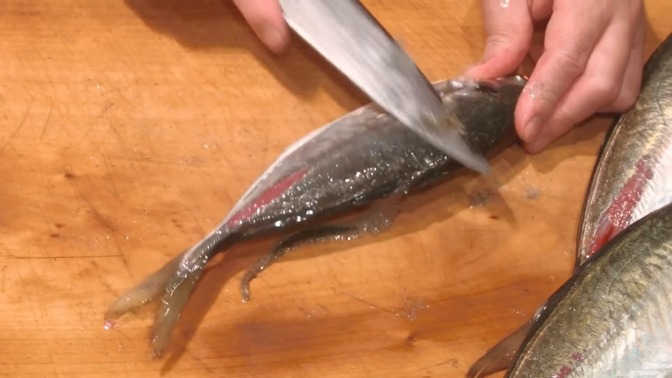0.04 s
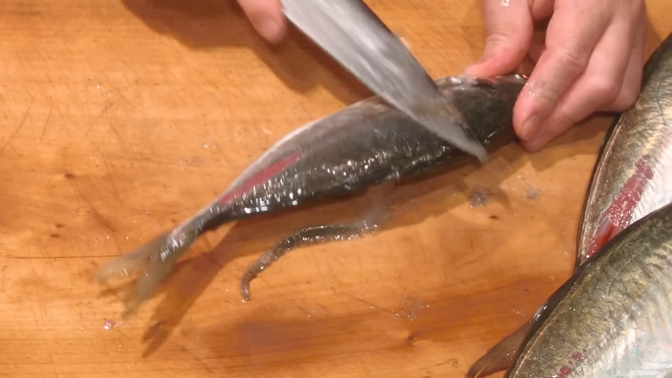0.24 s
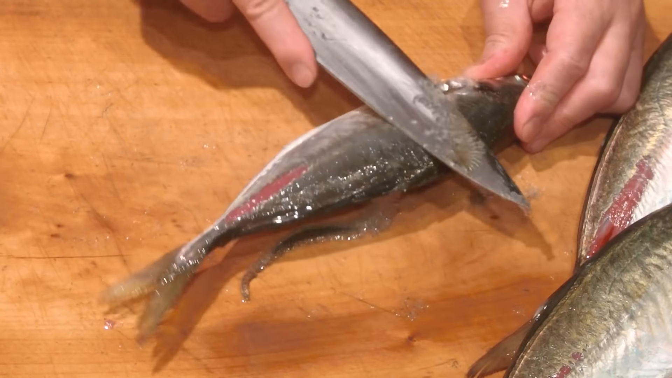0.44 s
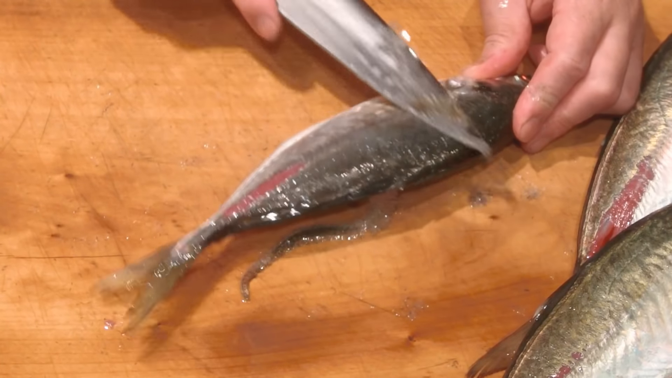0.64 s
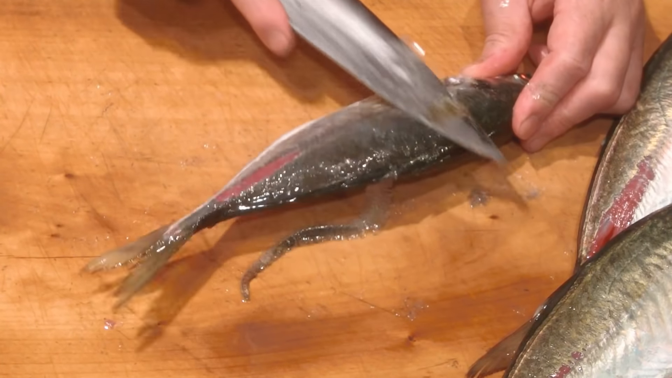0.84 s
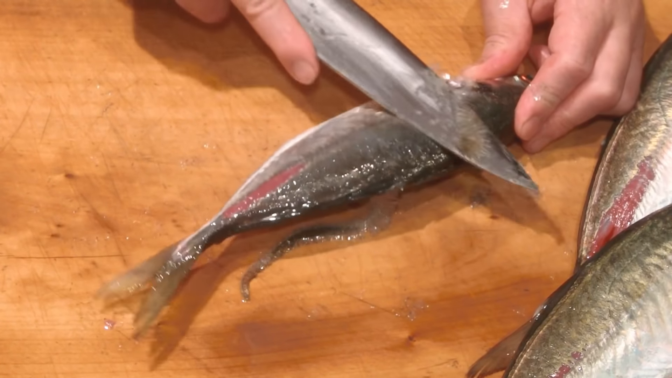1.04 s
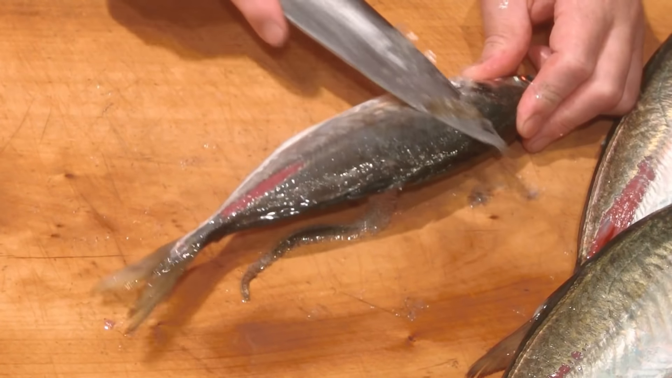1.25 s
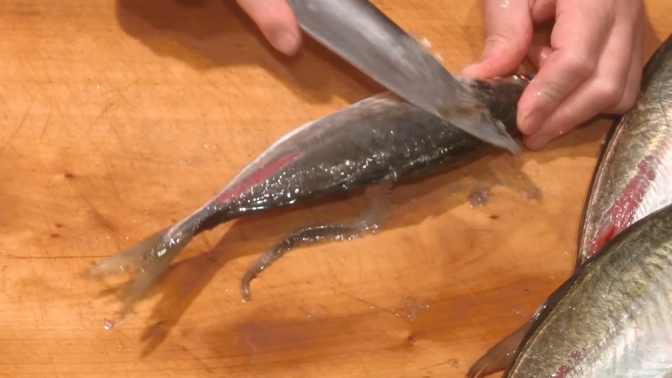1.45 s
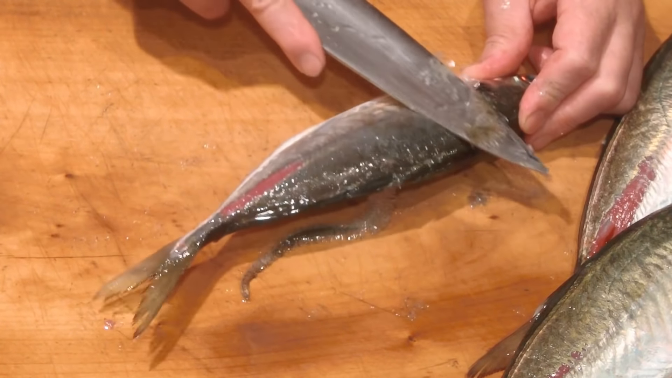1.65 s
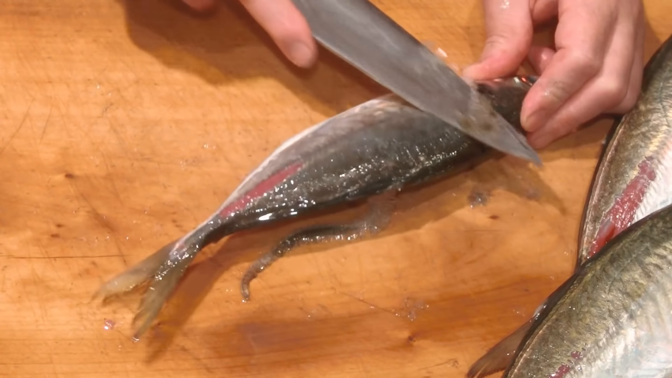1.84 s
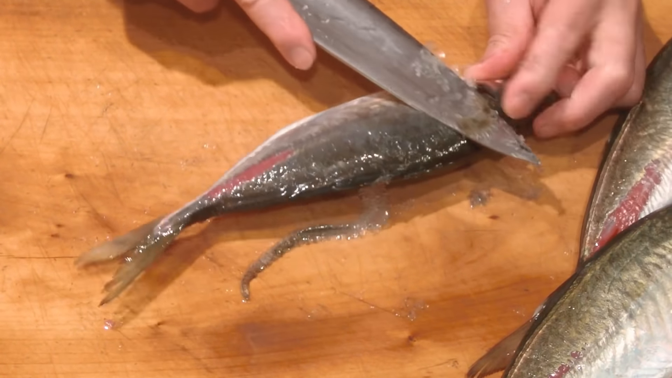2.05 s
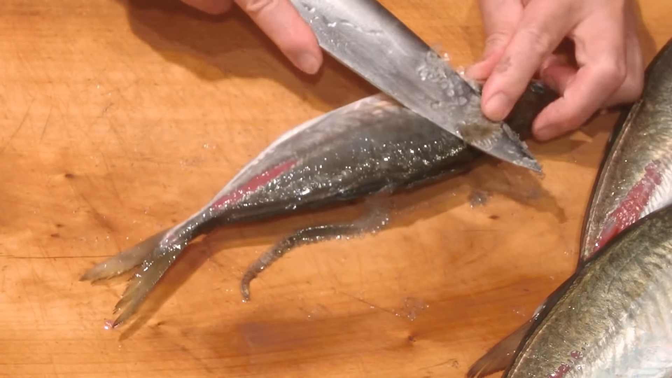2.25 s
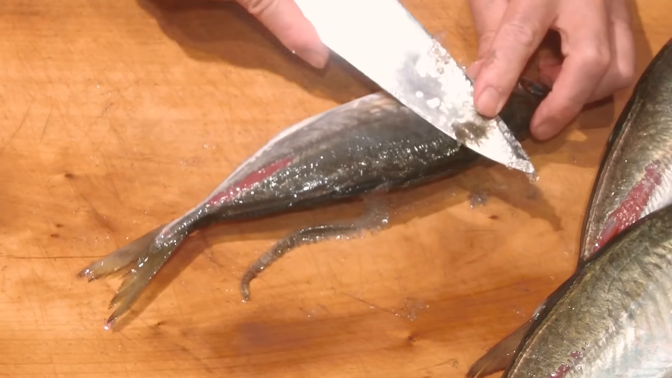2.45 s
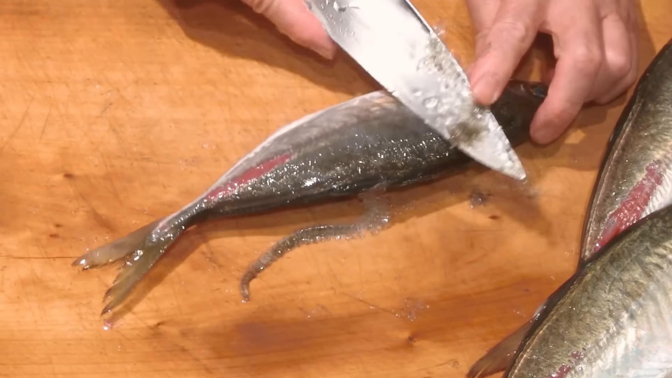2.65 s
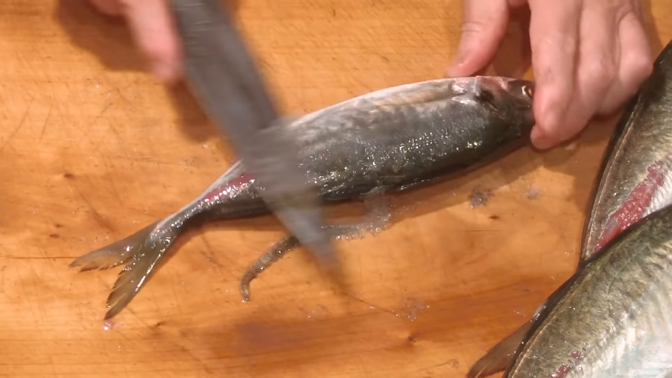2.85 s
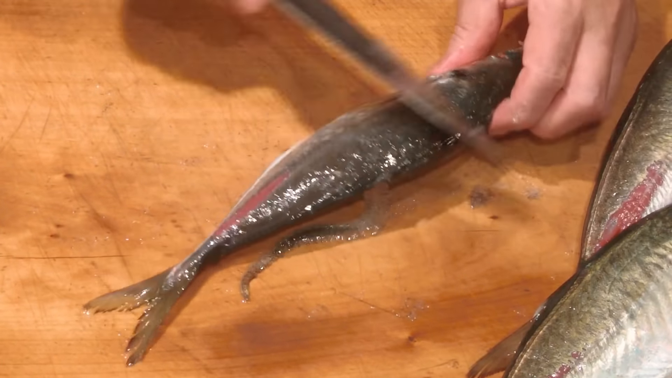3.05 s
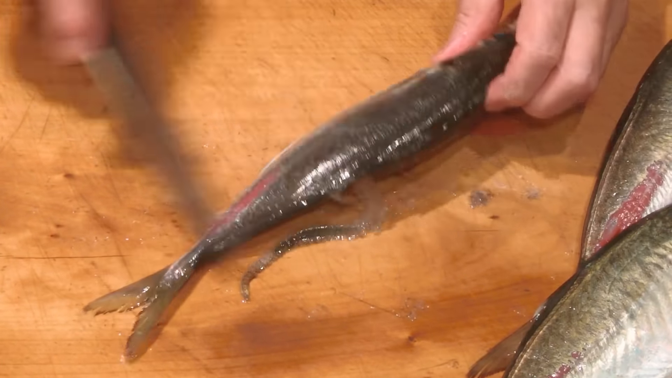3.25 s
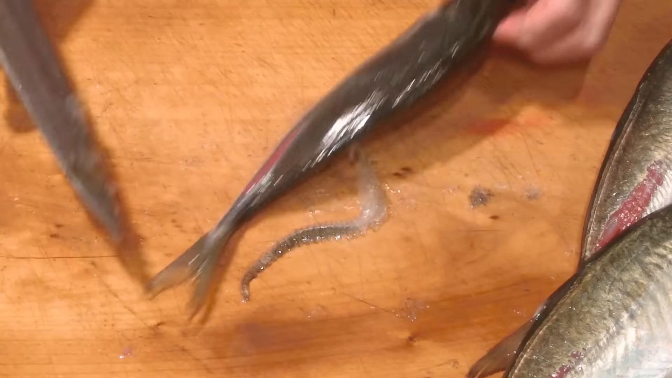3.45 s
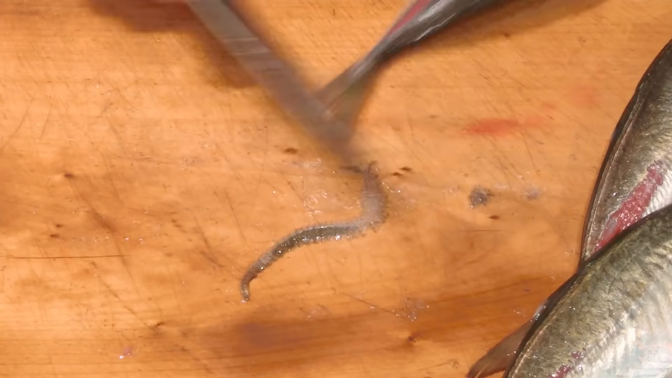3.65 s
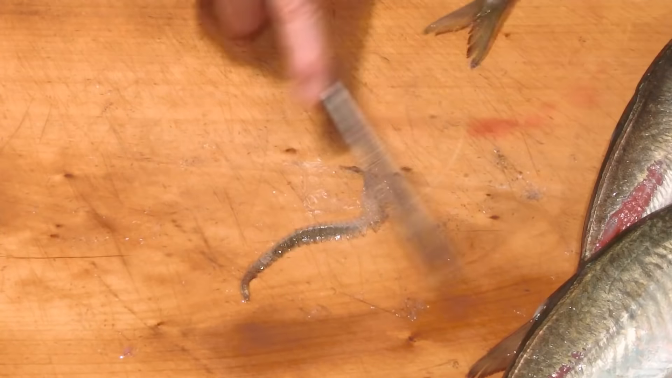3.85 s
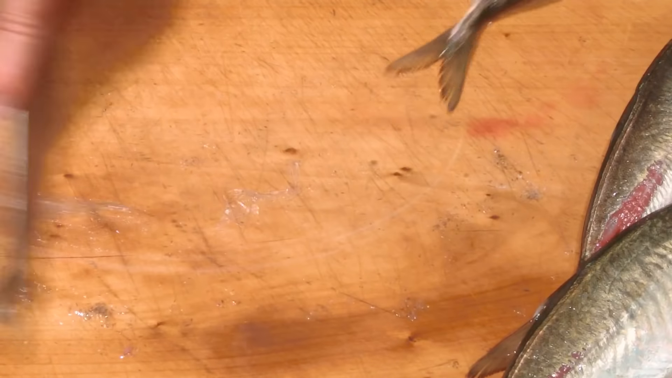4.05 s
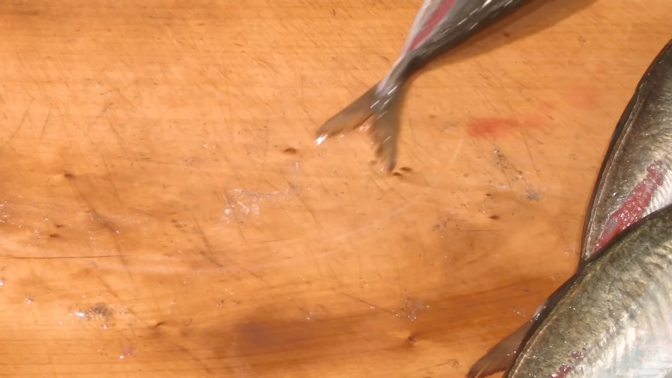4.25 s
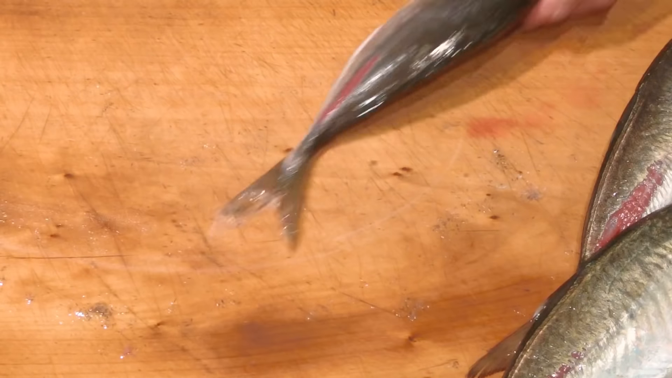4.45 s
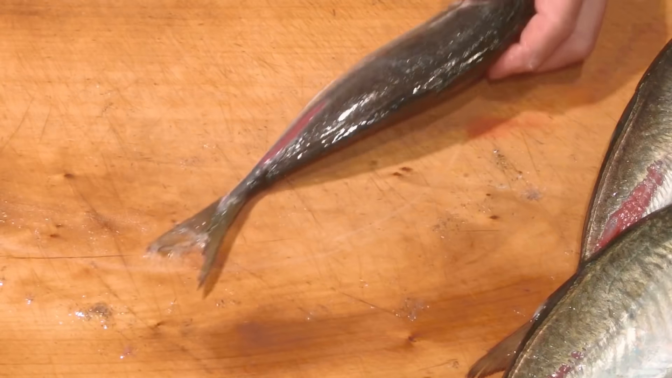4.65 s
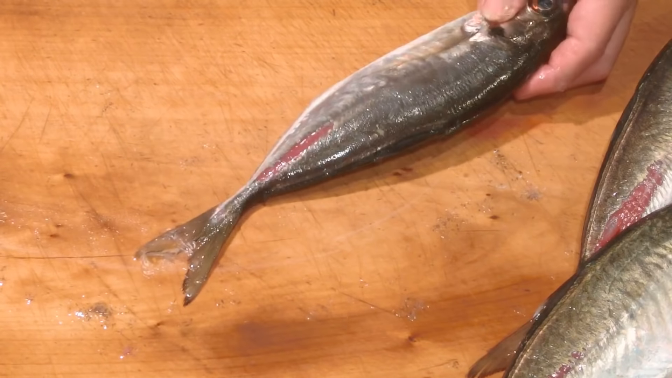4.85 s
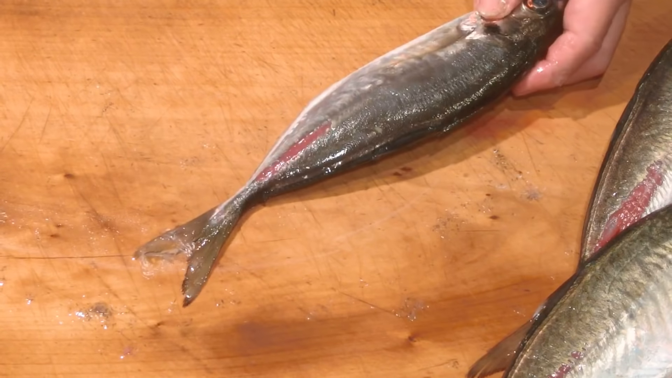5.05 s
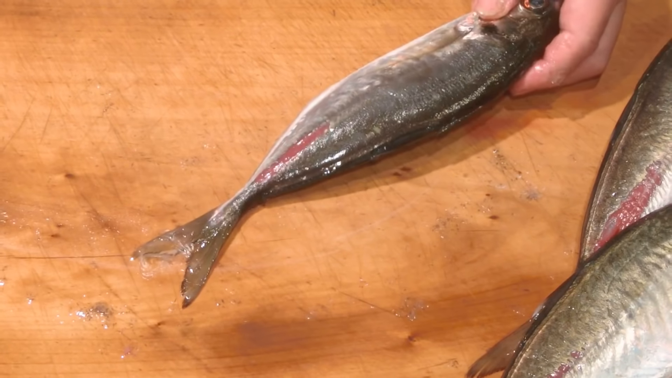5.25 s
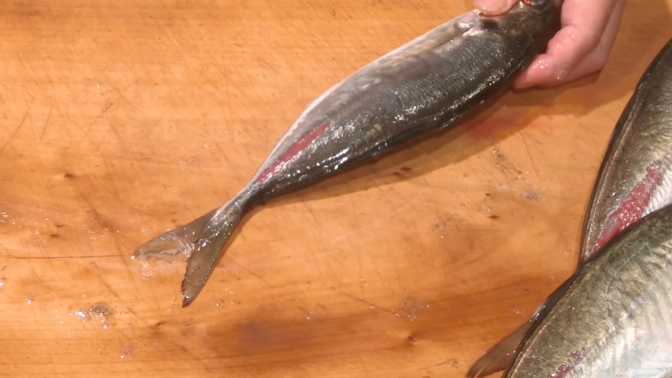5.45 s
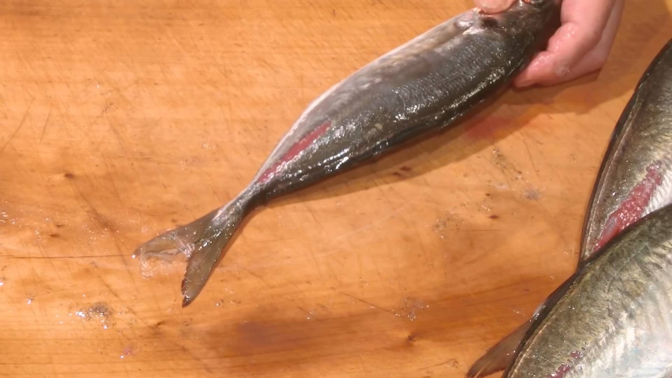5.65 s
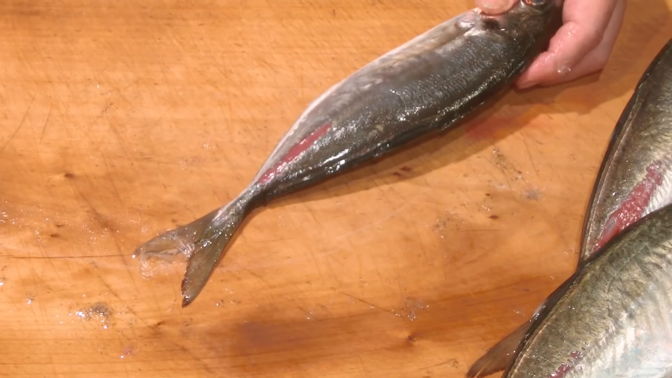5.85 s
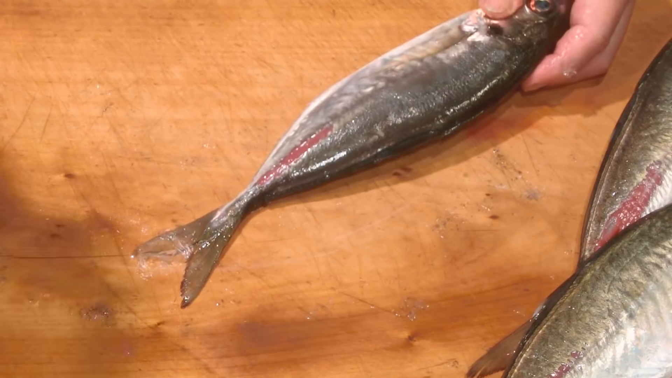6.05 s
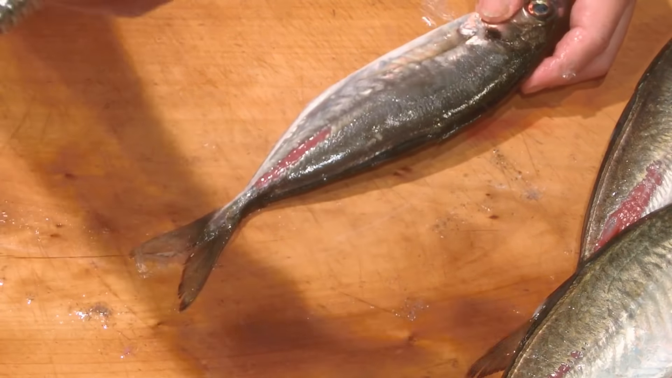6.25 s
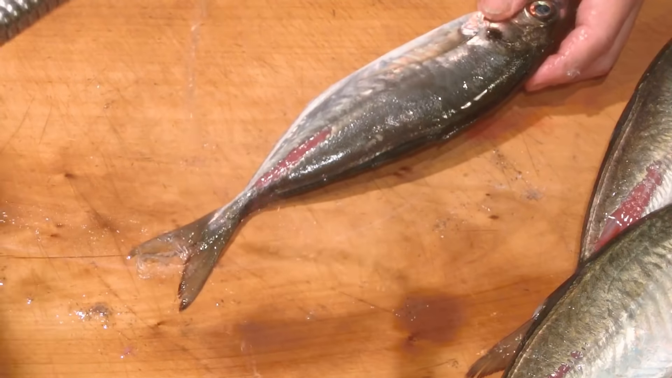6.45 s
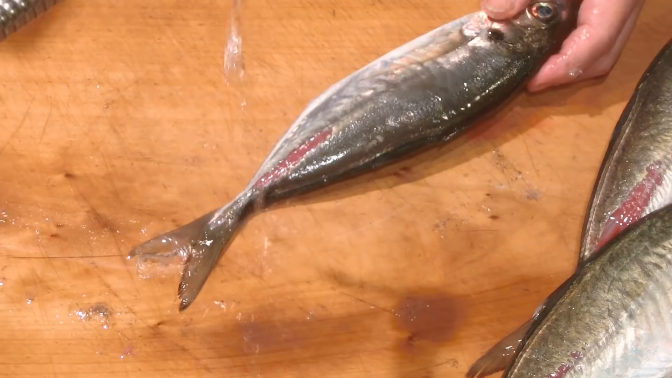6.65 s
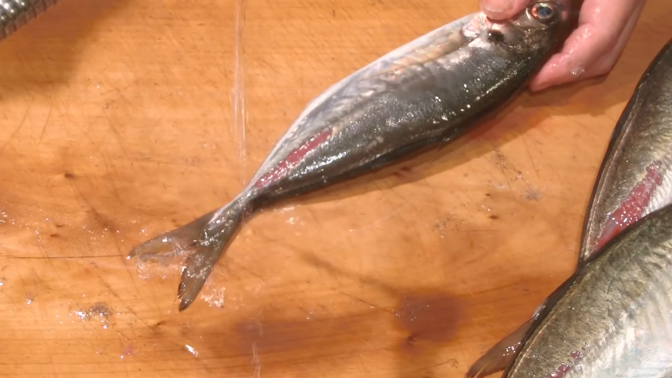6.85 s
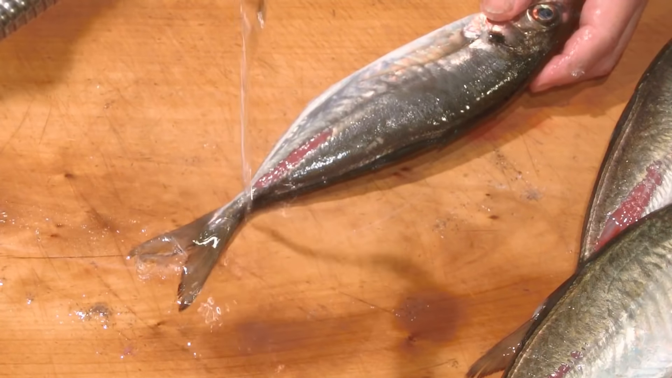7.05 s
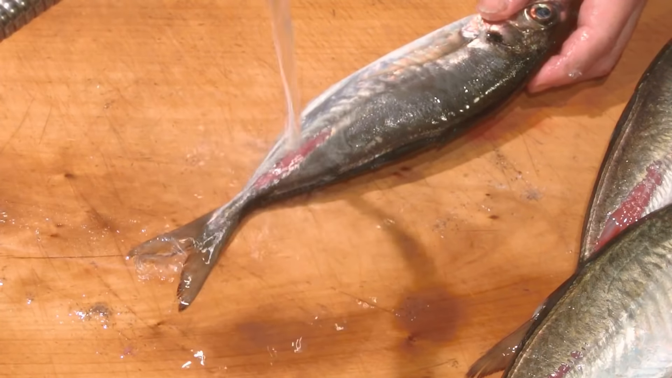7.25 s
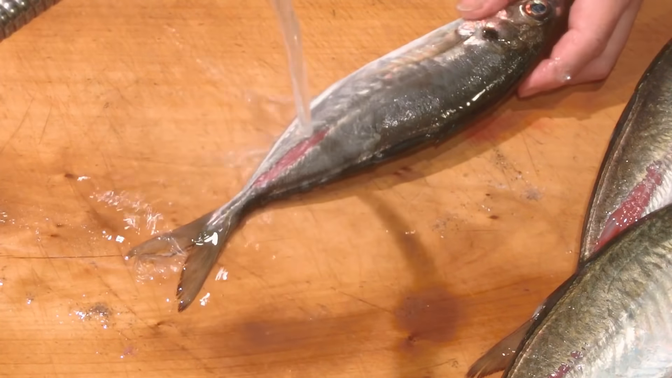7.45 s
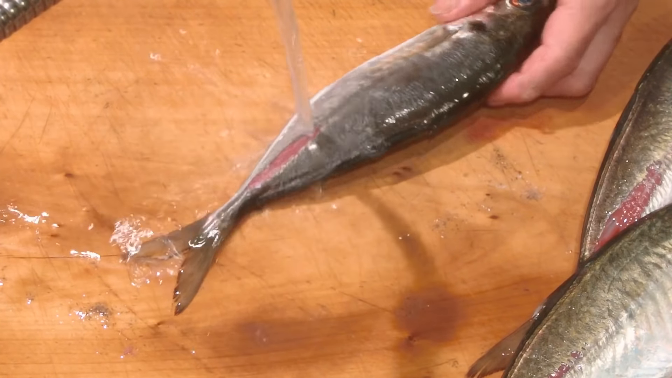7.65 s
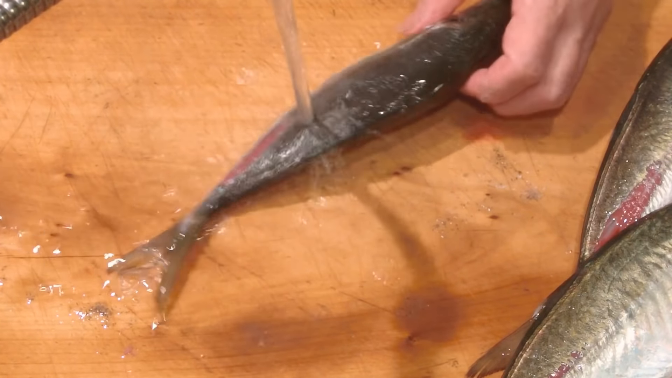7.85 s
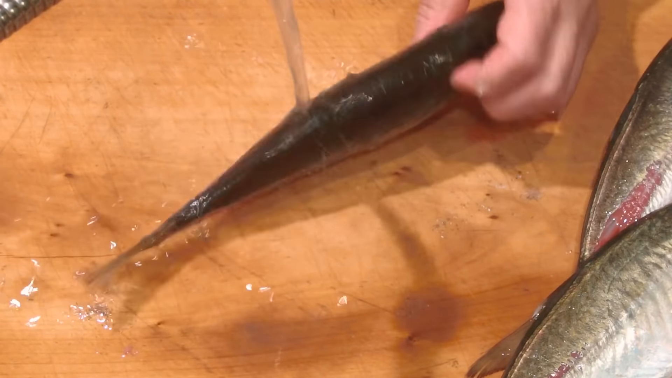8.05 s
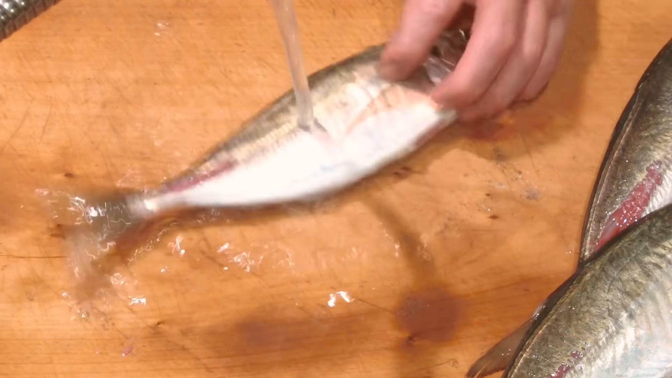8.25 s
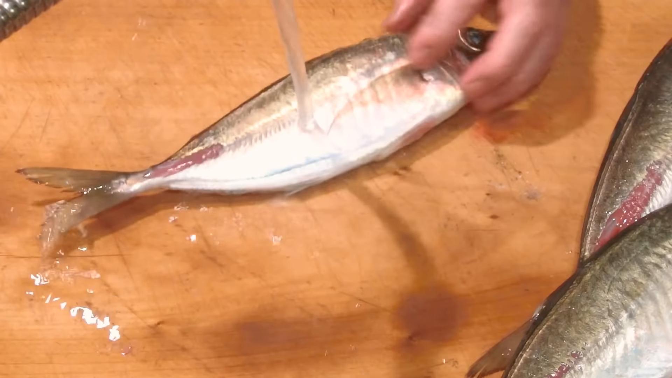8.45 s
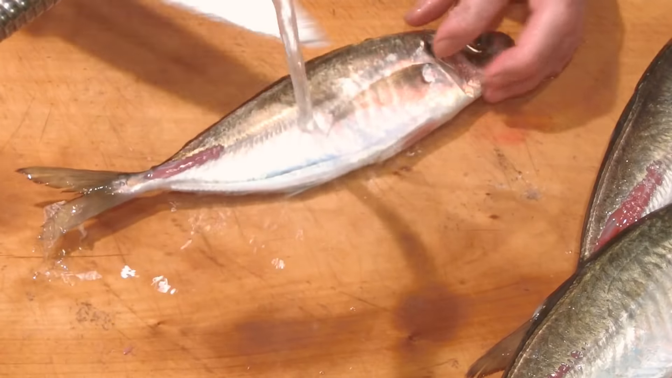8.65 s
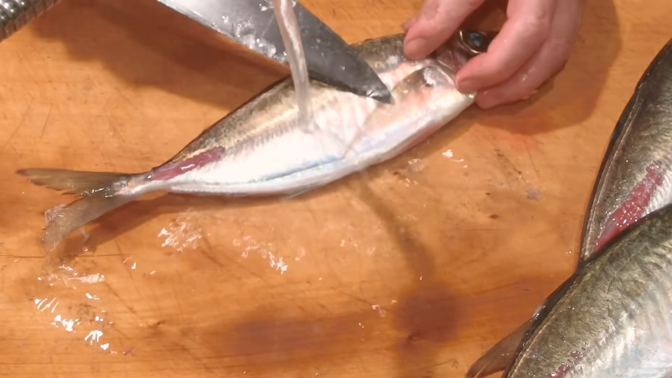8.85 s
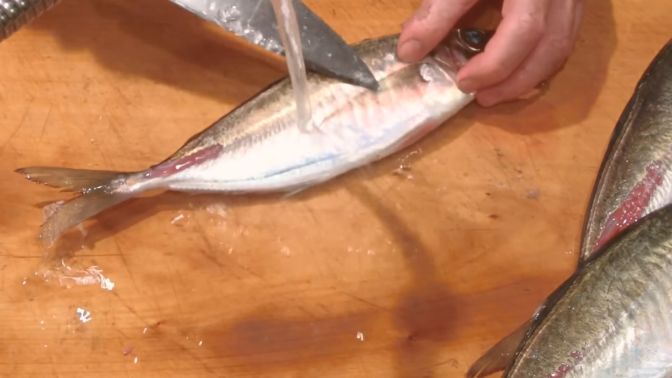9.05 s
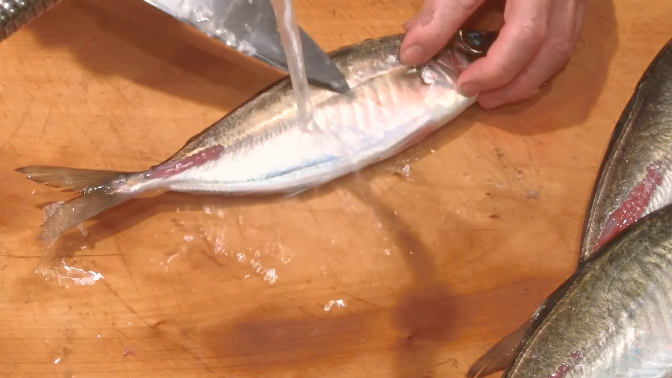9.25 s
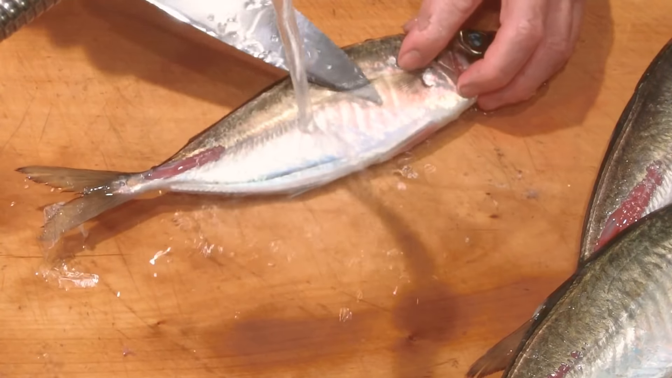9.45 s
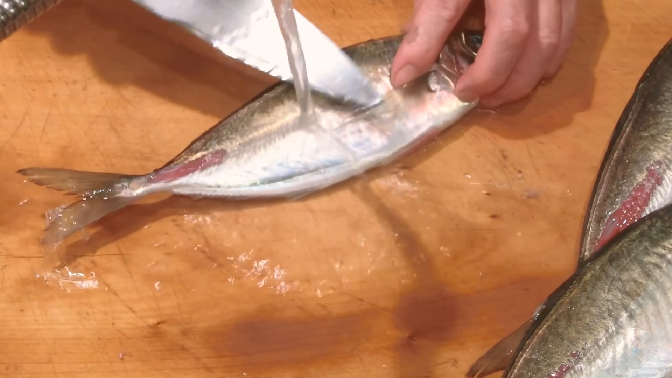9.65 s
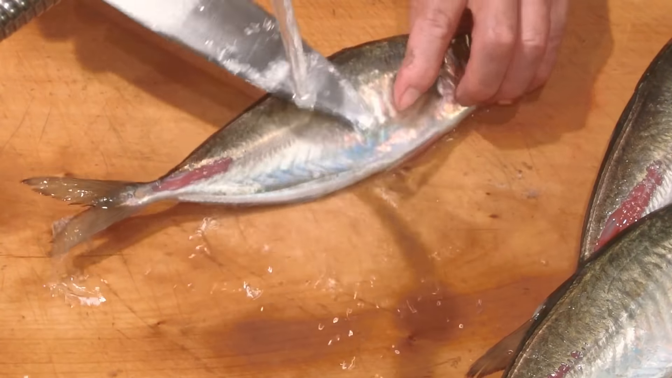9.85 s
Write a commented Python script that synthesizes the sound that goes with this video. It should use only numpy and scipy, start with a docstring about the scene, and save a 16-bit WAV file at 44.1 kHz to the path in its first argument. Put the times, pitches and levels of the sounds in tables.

```python
"""Cleaning a fish at the kitchen counter

A knife works in wet flesh on a wooden board, wipes the scraps off and is put down with a few knocks.
Then a tap spits, and its thin stream fizzes and bubbles on the fish while the blade picks at it again.
Board, blade and bubbles are resonators fed by noise, clicks or sines; wet flesh and spray are crowds of
clicks. A fan rushes throughout as coloured noise, with mains hum and a thin whine as wavering tones."""
import sys
import numpy as np
from scipy import signal
from scipy.fft import rfft, irfft, next_fast_len
from scipy.io import wavfile

SR = 44100
rng = np.random.default_rng(int(sys.argv[2]) if len(sys.argv) > 2 else 0)


def master_out(mix):
    """Clip the mix to full scale and print it as 16-bit PCM to the path in sys.argv[1]."""
    frames = np.transpose(np.atleast_2d(mix))
    ceiling = np.clip(frames, -1, 1)
    pcm = np.round(ceiling * 32767).astype(np.int16)
    wavfile.write(sys.argv[1], SR, pcm)


N = 437031
TIME = np.arange(N) / SR

# Blows on the board: t/s, strength/dB, thud f/Hz, contact hardness as a low-pass f/Hz, crack/dB re dense part,
# relative level of the wet blade's chink/dB, f/Hz of the resonance favoured by the spot, its gain/dB
BOARD_BLOWS = [(3.637, 5, 225, 1840, -7, -38, 258, 10.5), (3.6405, -15, 302, 3180, -15, -38, 3200, 13),
               (3.6585, -4, 258, 2790, -18, -35, 463, 16), (3.671, -7, 258, 1800, -19, -32, 460, 16),
               (3.788, -12, 1300, 5000, 0, -23, 4210, 19), (3.956, -18, 1300, 5000, -6, -25, 1500, 8),
               (4.067, -29, 1500, 6000, -8, -24, 3250, 8), (4.12, -3.5, 1190, 6550, -6, -17.5, 4920, 13.5),
               (4.146, -7.5, 1170, 5000, -15, -21, 1395, 15), (4.5252, -7, 200, 1010, -4, -32, 877, 9),
               (4.733, -2, 400, 2500, -14, -21, 960, 18), (4.737, 9.5, 216, 1680, -3, -12.5, 1700, 7),
               (4.755, 3, 230, 350, -13, -38, 140, 3), (4.9579, -6, 300, 3800, -11, -23, 1120, 13),
               (5.157, -4.5, 200, 4700, -11, -8.5, 1940, 17), (5.159, -4, 250, 2500, -6, -25, 1540, 14),
               (5.2010, -5.5, 259, 3600, -2.5, -28, 650, 12), (5.3285, 9, 443, 3200, -8, -12, 437, 16),
               (5.3293, 11.5, 386, 2260, 6, -19, 1476, 9.5), (5.331, 11.5, 370, 2400, -4, -18, 357, 11),
               (8.121, -12.5, 1310, 7000, 2.5, -21, 1820, 14), (8.128, -24, 1500, 6000, -1, -29, 2920, 6)]
# Resonances of the wooden board: f/Hz, width/Hz, relative level/dB
BOARD_MODES = [(353, 24, 3), (436, 16, -6.5), (480, 30, -6), (680, 60, -10), (820, 60, -7), (880, 35, -1.5),
               (958, 40, -1), (1311, 55, -6), (1415, 30, -6), (1476, 40, 4), (1600, 50, -11),
               (1825, 70, -1), (1975, 70, -1), (2138, 40, -0.5), (2350, 60, -5), (2487, 30, -6),
               (2885, 90, 0), (3150, 150, -13), (3790, 50, -8)]
# Resonances of the steel blade: f/Hz, width/Hz, relative level/dB
BLADE_MODES = [(866, 40, 7), (1030, 120, 8.5), (1355, 86, 7.5), (1496, 59, 11), (1770, 220, 10),
               (2200, 60, 8), (2410, 50, 9), (2670, 110, 6.5), (3170, 190, 2), (3760, 61, -1),
               (4190, 60, 4.5), (4580, 150, 4.5), (4920, 93, -1), (5700, 200, 0.5), (6800, 330, -4.5),
               (8040, 540, -2.5), (9320, 440, -4), (10450, 180, -4), (11200, 400, -1.5), (12500, 400, -1.5),
               (13500, 440, -7), (14100, 420, -8)]
# Strokes of the blade over board and fish: start t/s, length/s, relative level of the dry rasp/dB,
# relative level of the wet hiss/dB, change of pressure along the stroke/dB
BLADE_STROKES = [(2.989, 0.089, -70, -51, 4), (3.14, 0.071, -61, -45, -8), (3.592, 0.12, -49, -51.5, -0.5),
                 (3.7, 0.083, -46.5, -41.5, 3.5), (3.805, 0.23, -42.5, -43.5, -8.5),
                 (4.032, 0.098, -47.5, -49, -3), (4.14, 0.23, -56, -52.5, -1.5),
                 (4.394, 0.1, -50.5, -49, 0), (4.818, 0.058, -49, -34.5, -1)]
# The sliding edge makes one blade resonance sing: t/s, length/s, f/Hz, level/dB
EDGE_SQUEAKS = [(2.98, 0.11, 4230, -64), (3.01, .08, 4340, -64), (2.995, 0.095, 2164, -63),
                (3.04, 0.038, 2170, -60), (3.027, 0.055, 2720, -61), (3.09, 0.072, 4300, -66),
                (3.14, 0.035, 1090, -60), (3.15, 0.095, 4860, -65), (3.726, 0.077, 1910, -49),
                (3.73, 0.063, 2370, -50), (3.72, 0.07, 3860, -54), (3.779, .028, 4270, -43.5),
                (3.812, 0.15, 4240, -61), (3.842, 0.08, 2110, -52), (3.86, 0.06, 1830, -55),
                (3.794, 0.044, 2250, -51.5), (3.828, 0.079, 1550, -51), (4.055, 0.023, 3280, -57),
                (4.824, 0.064, 4550, -51), (4.831, .055, 1330, -53), (4.848, 0.043, 2430, -53)]
# Judder of the wiping edge on the wood: start t/s, length/s, f/Hz, relative level/dB, change of pressure/dB
EDGE_JUDDERS = [(3.685, 0.053, 307, -37.5, -4), (3.79, 0.18, 340, -39, -3)]
# Loudest squelches of wet flesh: t/s, length/s, crackle level/dB, lowest f/Hz, highest f/Hz, squish level/dB
FLESH_SQUELCHES = [(0.106, 0.057, -55.5, 4800, 9000, -64), (0.22, 0.13, -51.5, 7100, 18000, -71),
                   (0.226, .065, -56.5, 4400, 5400, -69), (0.391, 0.11, -53.5, 5000, 18000, -58.5),
                   (0.479, .035, -50, 5460, 6770, -66), (0.513, .036, -60, 7000, 15000, -71),
                   (0.549, 0.06, -50.5, 7000, 18000, -66), (.556, .04, -57.5, 4300, 5200, -70),
                   (0.71, 0.07, -59, 4500, 15000, -61), (0.825, 0.12, -57, 10000, 15000, -70),
                   (0.927, 0.069, -57, 3000, 12000, -54.5), (1.007, 0.052, -47, 5330, 13100, -62),
                   (1.12, 0.16, -60, 10000, 15000, -72), (1.298, .1, -53.5, 6000, 18000, -64),
                   (1.402, 0.1, -53, 5000, 18000, -58), (1.644, 0.14, -58, 6000, 15000, -59.5),
                   (1.859, 0.055, -54, 3000, 15000, -53.5), (2.09, 0.049, -48.5, 3000, 16000, -58),
                   (2.206, 0.013, -45, 5300, 14000, -66), (2.374, .07, -59, 3000, 7000, -56),
                   (2.609, .08, -58, 3000, 6200, -58.5), (5.534, 0.054, -59, 3000, 7000, -54),
                   (9.867, 0.051, -42.5, 3500, 15000, -63)]
# Wet ticks as skin and fibres part: t/s, relative level/dB, f/Hz
FIBRE_SNAPS = [(0.394, -38, 12000), (0.521, -33, 13000), (0.72, -39, 13000), (0.955, -44, 13500),
               (1.005, -34, 13000), (1.403, -35, 13000), (2.341, -42, 13000)]
# Air and water spat by the tap before it runs: t/s, length/s, relative level/dB, lowest f/Hz
TAP_SPITS = [(6.05, .03, -51.5, 4000), (6.242, 0.043, -53, 7000), (6.287, 0.035, -43, 6960),
             (6.464, .064, -49, 5000), (6.62, 0.0092, -40, 3500), (6.675, 0.11, -55, 9000),
             (6.8, 0.05, -46, 9800), (7.032, 0.046, -48, 5000)]
# Spectrum of the fizzing spray: f/Hz, relative level/dB
SPRAY_SPECTRUM = [(3000, 2.5), (4500, 2.5), (6000, -1), (7200, -2), (8800, 1), (9700, 5), (10700, 3),
                  (12700, 5.5), (14000, 4), (15500, 1)]
# Single large bubbles in the puddle: t/s, relative level/dB, starting f/Hz
LARGE_BUBBLES = [(7.06, -49.5, 2900), (7.215, -52, 3000), (7.483, -48, 1850), (7.507, -47, 1810),
                 (7.985, -49, 2050), (8.025, -41, 2300), (8.067, -47, 2430), (8.21, -54, 2100),
                 (8.32, -48, 1960), (8.346, -47, 1890), (8.353, -49, 2480), (8.374, -44, 1810),
                 (8.583, -48, 1900), (8.649, -45, 2180), (8.72, -52, 2950), (8.875, -48, 2350),
                 (8.905, -48, 2300), (9.055, -50, 2100), (9.106, -51, 2200), (9.15, -46, 3000),
                 (9.226, -41.5, 1830), (9.312, -45, 2330), (9.32, -48, 1960), (9.425, -50, 1750),
                 (9.465, -42.5, 2330), (9.485, -43, 1850), (9.577, -49, 2220)]
# Loudest drops and bursting bubbles: t/s, relative level/dB, starting f/Hz, share of broad splash/dB
LOUD_DROPS = [(6.277, -30, 4960, -12), (6.4862, -26, 5300, -13), (6.5183, -22.5, 10100, -9),
              (6.549, -34, 11500, -10), (6.62, -19, 12400, -24), (6.664, -32, 9100, -7),
              (6.721, -35, 10200, -14), (6.7357, -28, 11700, -9), (6.756, -31, 12500, -14),
              (6.795, -16.5, 12100, -20), (6.803, -19, 11000, -15), (6.905, -35, 12000, -6),
              (6.9656, -27, 11600, -15), (7.001, -32, 5380, -6), (7.009, -19.5, 8920, -13),
              (7.0284, -20, 10300, -3.5), (7.0763, -21, 12400, -17), (7.3388, -30, 12600, -11),
              (7.389, -23.5, 6900, -13), (7.461, -23.5, 9200, -11), (7.5973, -23, 12200, -15),
              (7.638, -28, 11500, -10), (7.670, -26, 12500, -10), (7.8234, -21, 8060, -15),
              (7.929, -24, 12500, -7), (7.941, -24, 10500, -9), (8.124, -23.5, 13100, 0.5),
              (8.2263, -30, 12900, -9), (8.2602, -30, 13700, -9), (8.2862, -16.5, 5540, -14.5),
              (8.3355, -28, 9100, -14), (8.454, -21.5, 9700, -20), (8.483, -30, 12800, -12),
              (8.629, -25.5, 13000, 0), (8.786, -26, 12800, -8), (8.966, -28, 12500, -8),
              (9.008, -33, 9360, -3), (9.045, -26, 11100, -6), (9.117, -26.5, 6250, -7),
              (9.1506, -21, 8500, -19), (9.18, -22.5, 7930, -15), (9.3275, -29, 7200, -6),
              (9.451, -24.5, 5480, -6), (9.468, -28, 12500, -3), (9.7503, -29, 12600, -10)]
# Spectrum of the fan's rush: f/Hz, relative density level/dB
FAN_SPECTRUM = [(15, -59), (25, -22), (48, -19), (87, -22.5), (127, -3.5), (373, -4.5), (476, -3),
                (575, -3.5), (714, -3.5), (1740, -12.5), (2800, -15.5), (3100, -18), (3300, -19),
                (5600, -21.5), (6050, -17.5), (6400, -23.5), (7110, -24), (10300, -22.5), (10900, -18),
                (11700, -24), (13200, -21.5), (16000, -28.5)]
# Mains hum, fan tones and thin whine: f/Hz, level/dB, width of the wander/Hz, wavering of the level/dB
STEADY_TONES = [(59.2, -71.5, 1.2, 2), (118, -71.5, 2.5, 1.5), (284, -67, 15, -0.5),
                (405, -64.5, 27.1, -0.5), (474, -62.5, 38.7, 0.5), (719, -68, 26.5, 1), (2967, -76, 10, 2),
                (3086, -73.5, 10, 2), (6052, -72, 9, 1.2)]

BITE_S, LIFT_T60_S = 0.024, 0.1   # the edge takes hold, and lets go at the end of a stroke
SQUISH_LOW_HZ, SQUISH_HIGH_HZ = 1530, 2670
CUTTING_END_S, CUTTING_FADE_S, CUTTING_DB = 2.3, 0.46, -61
SPIT_TOP_HZ = 15500
TAP_OPEN_S, STREAM_RISE_S = 7.0, 0.12
TURN_S, TURN_LASTS_S = 8.2, 0.85   # middle and length of the turning over of the fish
# The jet digs larger bubbles on the belly than on the back; the spray and puddle levels are relative
BACK_BUBBLE_HZ, BELLY_BUBBLE_HZ = 2850, 2130
BACK_BUBBLE_DB, BELLY_BUBBLE_DB = -60.5, -55
BACK_SPRAY_DB, BELLY_SPRAY_DB = -48.5, -47
SURGE_DB, SURGE_HZ = 2.5, 10.6   # the bubbling comes in small surges
JET_RING_HZ, JET_RING_WIDTH_HZ, JET_RING_DB = 2900, 330, -63.5   # the hollow that the jet keeps open in the water
# Smaller drops thrown off by the stream; their levels are relative, as in the table of loud drops
DROPLETS_PER_S, DROPLET_DB, DROPLET_SPREAD_DB, DROPLET_SPLASH_DB = 14, -44, 8, -1
DROPLET_LOW_HZ, DROPLET_HIGH_HZ = 6250, 14600
FAN_DB = -51
WAVER_HZ = 3
KITCHEN_T60_S = 0.22
CUTOFF_HZ = 15400


def knocks(modes_db=3.0, plain_db=-1.5, dead_hz=1080, dead_width_hz=190, thud_db=-3, thud_share=0.11,
           dense_t60=0.099, chink_t60=0.14, chink_db=5, favoured_width_hz=22, favoured_share=0.011,
           thump_db=-9, thump_hz=125, thump_width_hz=24):
    """Impact excitation: a crack and a dense shudder, dulled by a soft contact, ring board, counter and blade."""
    blows, chinks, thumps = np.zeros((3, N))
    for s, db, thud_hz, hard_hz, crack_db, wet_db, favoured_hz, favoured_db in BOARD_BLOWS:
        blow = burst(dense_t60)
        blow[0] += from_db(crack_db)
        blow = cut(blow, hard_hz, "low")

        favoured_width = favoured_width_hz + favoured_share * favoured_hz
        add(thumps, s, from_db(db + favoured_db) * resonate(blow, favoured_hz, favoured_width))
        add(thumps, s, from_db(db + thump_db) * resonate(blow, thump_hz, thump_width_hz))   # the counter

        blow = cut(blow, 0.58 * thud_hz, "high", order=3)
        thud = resonate(blow, thud_hz, thud_share * thud_hz)   # its pitch is set by the spot that is hit
        add(blows, s, from_db(db) * (blow + from_db(thud_db) * thud))
        add(chinks, s, from_db(wet_db + chink_db) * burst(chink_t60))
    ringing = sum(from_db(db) * resonate(blows, hz, width) for hz, width, db in BOARD_MODES)
    # the board hardly answers in one gap between its resonances
    shudder = blows - resonate(blows, dead_hz, dead_width_hz)
    board = from_db(plain_db) * shudder + from_db(modes_db) * ringing
    return board + cut(thumps, 100, "high", order=3) + wet_blade(chinks)


def scrape(catch_db=1.0, dull_hz=3800, rasp_level_db=-2.0, film_level_db=-2.5):
    """Sliding friction: tiny slips of the edge ring the blade, and the wet film hisses."""
    # the edge grips and lets go unevenly
    catching = from_db(catch_db * rms_one(cut(rng.standard_normal(N), 54, "low")))
    slips = cut(catching * grains(2200, 4.3), dull_hz, "low", order=1)
    rasp = from_db(rasp_level_db) * rms_one(blade(slips))
    film = from_db(film_level_db) * rms_one(wet_blade(catching * grains(5000, 2.6)))
    out = 0
    for s, length, rasp_db, wet_db, change_db in BLADE_STROKES:
        stroke = from_db(rasp_db) * rasp + from_db(wet_db) * film
        out = out + pressure(s, length, change_db) * stroke
    return out


def squeaks(width_hz=100):
    """Friction-driven resonance: slips of the edge feed one narrow mode, which swells and fades."""
    out = np.zeros(N)
    for s, length, hz, db in EDGE_SQUEAKS:
        swell = np.hanning(int(length * SR))
        sung = resonate(rng.standard_normal(SR // 4), hz, width_hz)
        sung = resonate(sung, hz, width_hz)[-len(swell):]   # the end, where the resonance has built up
        add(out, s, from_db(db) * rms_one(swell * sung))
    return out


def judder(width_hz=30, level_db=-6.5):
    """Stick-slip oscillation: the edge groans on the wood, its slips varying in force and timing."""
    strong, late = rms_one(cut(rng.standard_normal((2, N)), width_hz, "low", order=1))
    out = 0
    for s, length, hz, db, change_db in EDGE_JUDDERS:
        phase = 2 * np.pi * hz * TIME
        groan = rms_one((1 + 0.69 * strong) * np.sin(phase) + 0.89 * late * np.cos(phase))
        out = out + from_db(db + level_db) * pressure(s, length, change_db) * groan
    return out


def pressure(start, length, change_db):
    """Contact force in one stroke: the edge takes hold, leans in or eases off, and lifts."""
    t = TIME - start
    hold = np.clip(t / BITE_S, 0, 1)
    lean = from_db(change_db * np.clip(t / length, 0, 1))
    lift = dying(np.clip(t - length, 0, 1), LIFT_T60_S)
    return hold * lean * lift


def blade(x, shift_db=2.0, shift_hz=9):
    """Modal excitation: a contact travelling along the edge shifts which resonances of the blade speak."""
    # one gain per 20 samples
    shifts = rms_one(cut(rng.standard_normal((len(BLADE_MODES), N // 20 + 1)), 20 * shift_hz, "low"))
    gains = from_db(shift_db * shifts)
    return sum(from_db(db) * np.repeat(gain, 20)[:N] * resonate(x, hz, width)
               for (hz, width, db), gain in zip(BLADE_MODES, gains))


def wet_blade(x, plain_db=-2, lowest_hz=2800):
    """Squeezed-film noise: water pressed out under the edge hisses brightly, tinged by the steel."""
    return cut(blade(x) + from_db(plain_db) * x, lowest_hz, "high")


def squelches():
    """Tearing of a wet solid: the flesh parts with a bright crackle and a lower squish."""
    out = np.zeros(N)
    for s, length, db, low_hz, high_hz, squish_db in FLESH_SQUELCHES:
        add(out, s, from_db(db) * crackle(length, low_hz, high_hz))
        add(out, s, from_db(squish_db) * crackle(length, SQUISH_LOW_HZ, SQUISH_HIGH_HZ))
    return out


def snaps(snap_t60=0.032, width_share=0.26):
    """Sudden release of tension: a fibre parts with a tiny bright tick of decaying narrow-band noise."""
    out, t = np.zeros(N), TIME[:SR // 10]
    for s, db, hz in FIBRE_SNAPS:
        tick = rms_one(resonate(rng.standard_normal(len(t)), hz, width_share * hz))
        add(out, s, from_db(db) * 0.29 * tick * dying(t, snap_t60))
    return out


def cutting(lowest_hz=9500, uneven_db=3, uneven_hz=7):
    """Superposed micro-fractures: flesh crackles faintly for as long as the blade first works in it."""
    working = np.clip((CUTTING_END_S - TIME) / CUTTING_FADE_S, 0, 1)
    uneven = from_db(uneven_db * rms_one(cut(rng.standard_normal(N), uneven_hz, "low")))
    clicks = cut(grains(2000, 3.2), lowest_hz, "high")
    return from_db(CUTTING_DB) * working * rms_one(uneven * clicks)


def crackle(length, low_hz, high_hz):
    """Superposed impulses: a quickly swelling, slowly fading crowd of tiny wet clicks."""
    u = np.linspace(0, 1, int(length * SR))
    clicks = cut(grains(1500, 3.2, size=len(u)), [low_hz, high_hz], "band")
    return np.sin(np.pi * u ** 0.45) * rms_one(clicks)


def spits(level_db=-2.5):
    """Two-phase flow: each spit of air and water is a short bright crackle."""
    out = np.zeros(N)
    for s, length, db, low_hz in TAP_SPITS:
        add(out, s, from_db(db + level_db) * crackle(length, low_hz, SPIT_TOP_HZ))
    return out


def stream(fizz_db=-1.5, pinging_db=-7.0, bubbling_db=-3, spurt_db=0.9):
    """Jet break-up and entrained air: fine spray fizzes on the fish while bubbles ring in the puddle."""
    turned = np.clip((TIME - TURN_S) / TURN_LASTS_S + .5, 0, 1)
    puddle_db = BACK_BUBBLE_DB + turned * (BELLY_BUBBLE_DB - BACK_BUBBLE_DB)
    spray_db = BACK_SPRAY_DB + turned * (BELLY_SPRAY_DB - BACK_SPRAY_DB)
    flow = np.clip((TIME - TAP_OPEN_S) / STREAM_RISE_S, 0, 1) ** .5

    spurts = from_db(spurt_db * rms_one(cut(rng.standard_normal(N), 41, "low")))
    fizz = spurts * coloured(cut(grains(9000, 3.4), 2600, "high"), SPRAY_SPECTRUM)
    fizz = from_db(spray_db + fizz_db) * fizz
    pinging = from_db(spray_db + pinging_db) * spray_bubbles()

    surges = from_db(SURGE_DB * rms_one(cut(rng.standard_normal(N), SURGE_HZ, "low")))
    bubbling = from_db(puddle_db + bubbling_db) * rms_one(surges * puddle_bubbles(turned))
    hollow = resonate(surges * grains(200, 3.4), JET_RING_HZ, JET_RING_WIDTH_HZ)
    hollow = from_db(JET_RING_DB) * rms_one(hollow)
    return flow * (hollow + pinging + fizz + bubbling)


def puddle_bubbles(turned, cycles=30, spread_octaves=0.71):
    """Bubble resonance: pitch falls with bubble size, which follows where the jet lands."""
    centre_hz = BACK_BUBBLE_HZ + turned * (BELLY_BUBBLE_HZ - BACK_BUBBLE_HZ)
    bubbles = 0
    for hz in np.geomspace(1500, 3900, num=30):
        weight = np.exp(-.5 * (np.log2(hz / centre_hz) / spread_octaves) ** 2)
        bubbles = bubbles + resonate(weight * grains(22, 2.6), hz, hz / cycles)
    return bubbles


def spray_bubbles(cycles=55, per_s=25, spread_db=2.5):
    """Bubble resonance: tiny bubbles burst in the spray, each with a brief note."""
    notes = sum(resonate(grains(per_s, spread_db), hz, hz / cycles) for hz in np.geomspace(5000, 15000, num=24))
    return coloured(notes, SPRAY_SPECTRUM)


def gurgles(level_db=7, ring_t60=0.036, swell_t60=0.017, rise_per_s=2.1,
            froth_db=-10.5, froth_s=0.041, froth_ratio=1.19):
    """Bubble resonance: a large bubble rings with a rising note, in a froth of about its pitch."""
    out, t = np.zeros(N), TIME[:SR // 8]
    for s, db, hz in LARGE_BUBBLES:
        rising_hz = hz * (1 + rise_per_s * t)
        note = np.sin(2 * np.pi * np.cumsum(rising_hz) / SR)
        note = note * (1 - dying(t, swell_t60)) * dying(t, ring_t60)
        add(out, s, from_db(db + level_db) * note)
        add(out, s, from_db(db + froth_db) * crackle(froth_s, hz / froth_ratio, hz * froth_ratio))
    return out


def drops(level_db=4, ring_cycles=130, splash_t60=.025, swell_t60=.002):
    """Impact and air entrainment: a drop splashes and traps a bubble of rising note among similar ones."""
    out, t = np.zeros(N), TIME[:SR // 10]
    for s, db, hz, splash_db in LOUD_DROPS + droplets():
        rising_hz = hz * (1 + 0.066 * (1 - dying(t, 0.044)))
        note = np.sin(2 * np.pi * np.cumsum(rising_hz) / SR) * dying(t, ring_cycles / hz)
        splash = cut(rng.standard_normal(len(t)) * dying(t, splash_t60), hz * 0.53, "high")
        froth = rms_one(resonate(rng.standard_normal(len(t)), hz, 0.14 * hz)) * dying(t, 0.044)
        drop = 0.13 * note + 0.084 * froth + 0.4 * from_db(splash_db) * splash
        add(out, s, from_db(db + level_db) * (1 - dying(t, swell_t60)) * drop)
    return out


def droplets(count=80):
    """Poisson process: small drops fly off the running stream, as rows like those of the loud drops."""
    gap, size, pitch = rng.random((count, 3)).T
    times = TAP_OPEN_S + np.cumsum(-np.log(1 - gap)) / DROPLETS_PER_S
    levels = DROPLET_DB + DROPLET_SPREAD_DB * (2 * size - 1)
    pitches = DROPLET_LOW_HZ * (DROPLET_HIGH_HZ / DROPLET_LOW_HZ) ** pitch
    return [(s, db, hz, DROPLET_SPLASH_DB) for s, db, hz in zip(times, levels, pitches) if s < TIME[-1]]


def background():
    """Stationary noise and wavering tones: a fan rushes, the mains hum and something whines thinly."""
    mid, side = coloured(rng.standard_normal((2, N)), FAN_SPECTRUM)
    side = between_ears(side, treble_db=0.0, bass_db=-17)
    tones = 0
    for hz, db, width, waver_db in STEADY_TONES:
        # each value is held for 10 samples, so the waver is ten times slower than its filter
        slow = rms_one(cut(rng.standard_normal(N), 10 * WAVER_HZ, "low"))[np.arange(N) // 10]
        wander = rms_one(cut(rng.standard_normal(N), width, "low", order=1))
        phase = 2 * np.pi * np.cumsum(hz + width / 2 * wander) / SR
        tones = tones + from_db(db + waver_db * slow) * np.sqrt(2) * np.sin(phase)
    return from_db(FAN_DB) * (mid + side * [[1], [-1]]) + tones


def kitchen(x, width_db, room_db=-10):
    """Reverberation: walls answer after 6 ms; early reflections spread the treble between the ears."""
    echo = from_db(room_db) * np.pad(burst(KITCHEN_T60_S), (int(.006 * SR), 0))
    mid = x + signal.oaconvolve(x, echo)[:N]
    early = signal.oaconvolve(mid, burst(0.042))[:N]
    side = between_ears(early, width_db, bass_db=-26.0, wide_hz=3600)
    return mid + side * [[1], [-1]]


def between_ears(x, treble_db, bass_db=-20, wide_hz=3000):
    """Spatial coherence: the difference in a close microphone pair is slight in the bass, full in the treble."""
    treble = from_db(treble_db) * cut(x, wide_hz, "high", order=5)
    return treble + from_db(bass_db) * cut(x, 155, "high")


def burst(t60):
    """Diffuse decay: half a second of dying noise, unit energy, its spectrum evened so no pitch stands out."""
    fade = dying(TIME[:SR // 2], 2 * t60)   # applied twice, so the decay time is t60
    phases = np.angle(rfft(rng.standard_normal(len(fade)) * fade))
    x = irfft(np.exp(1j * phases), len(fade)) * fade
    return x / np.sqrt(np.sum(x ** 2))


def grains(per_s, spread_db, size=N):
    """Shot noise: random clicks of uneven size and sign."""
    sizes = from_db(spread_db * np.minimum(rng.exponential(1, size), 4))
    return (rng.random(size) < per_s / SR) * sizes * rng.choice([-1, 1], size)


def resonate(x, hz, width):
    """Damped oscillator: one resonance with gain 1 on top."""
    r = np.exp(-np.pi * width / SR)
    feedforward = np.array([1, 0, -1]) * (1 - r * r) / 2
    feedback = [1, -2 * r * np.cos(2 * np.pi * hz / SR), r * r]
    return signal.lfilter(feedforward, feedback, x + 1e-18)


def dying(t, t60):
    """Exponential decay: down 60 dB after t60 seconds."""
    return np.exp(-np.log(1000) * t / t60)


def coloured(x, spectrum):
    """Spectral shaping: weight a steady sound by a spectrum and scale it to rms 1."""
    size = next_fast_len(N)
    gains = from_db(at_hz(spectrum, np.fft.rfftfreq(size, 1 / SR)))
    return rms_one(irfft(rfft(x, size) * gains, size)[..., :N])


def at_hz(points, hz):
    """Interpolation: read a spectrum on a log-frequency axis."""
    f, db = np.transpose(points)
    return np.interp(np.log(np.maximum(hz, 1)), np.log(f), db)


def cut(x, hz, kind, order=2):
    """Butterworth filtering: causal low-, high- or band-pass."""
    edges = np.sort(np.clip(hz, 10, .47 * SR), axis=None).squeeze()
    return signal.sosfilt(signal.butter(order, edges, kind, fs=SR, output="sos"), x + 1e-18)


def from_db(db):
    """Logarithmic level: decibels to gain."""
    return 10 ** (np.asarray(db) / 20)


def rms_one(x):
    """Mean power: scale to unit rms."""
    return x / np.sqrt(np.mean(x ** 2) + 1e-20)


def add(track, s, sound):
    """Superposition: lay a sound into a track at its moment."""
    at = int(round(s * SR))
    track[at:at + len(sound)] += sound[:max(N - at, 0)]


def scene():
    """Superposition: knife, wet flesh and water sound in the kitchen, over the background."""
    knife = kitchen(knocks() + scrape() + squeaks() + judder(), width_db=-1.5)
    wet = kitchen(squelches() + snaps() + cutting() + spits() + gurgles() + drops(), width_db=-4.0)
    return knife + wet + kitchen(stream(), width_db=-6) + background()


def record(dry, threshold_db=-4, release_db_per_s=6, most_db=3):
    """Peak limiting: a loud peak turns the gain down for a moment; full scale clips and the top is cut."""
    peak_db = 20 * np.log10(np.abs(dry).max(axis=0) + 1e-9)
    over_db = np.clip(peak_db - threshold_db, 0, most_db)
    released_db = release_db_per_s * TIME
    held_db = np.maximum.accumulate(over_db + released_db) - released_db
    levelled = np.clip(dry * from_db(-cut(held_db, 43, "low", order=1)), -1, 1)
    return signal.sosfilt(signal.ellip(10, .2, 80, CUTOFF_HZ, fs=SR, output="sos"), levelled)


dry = scene()
out = record(dry)
master_out(out)
```